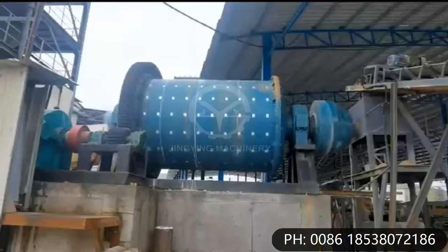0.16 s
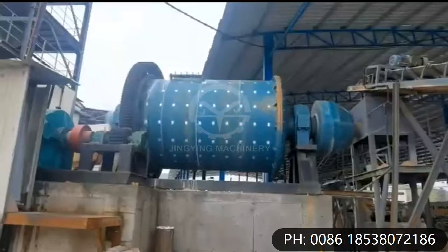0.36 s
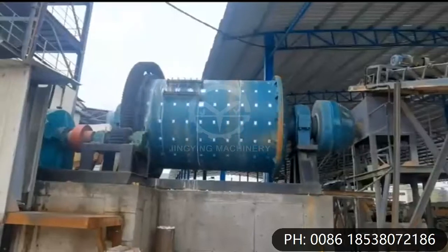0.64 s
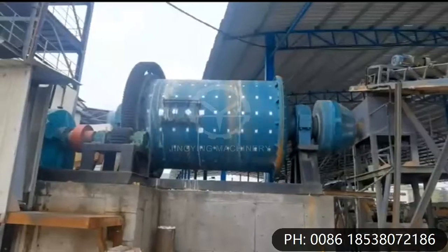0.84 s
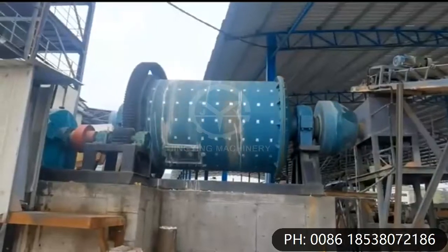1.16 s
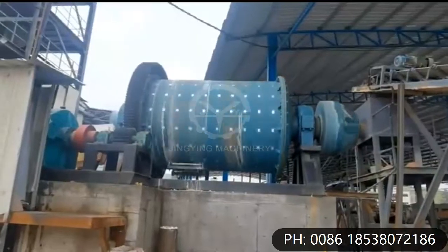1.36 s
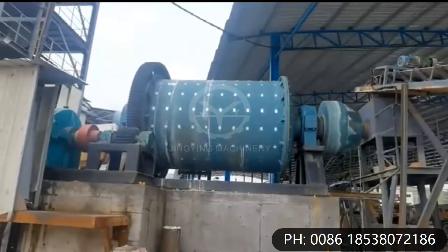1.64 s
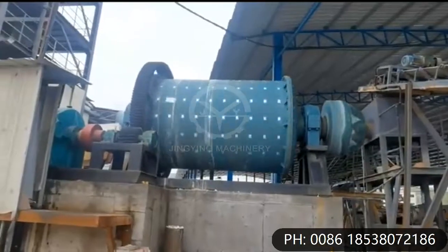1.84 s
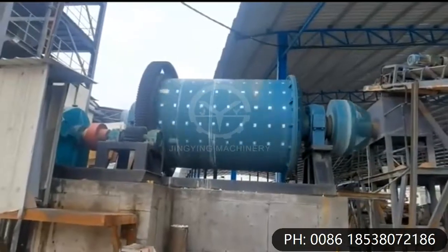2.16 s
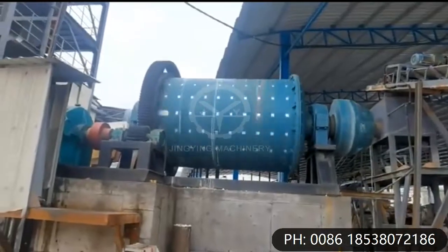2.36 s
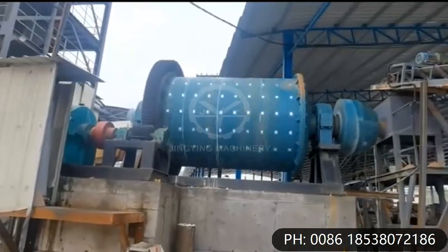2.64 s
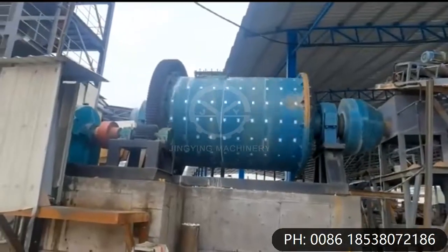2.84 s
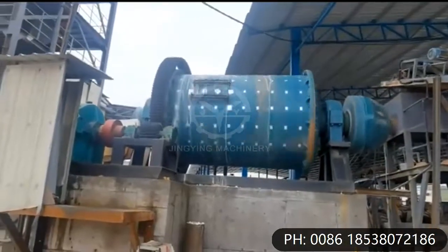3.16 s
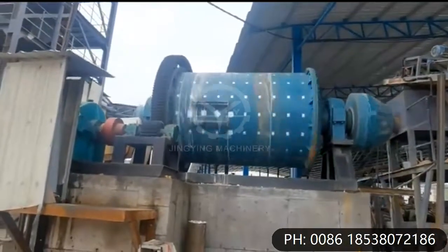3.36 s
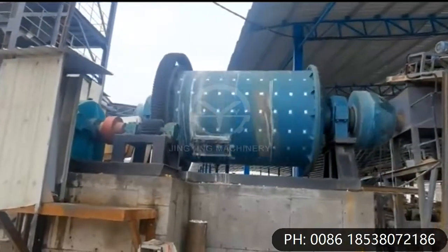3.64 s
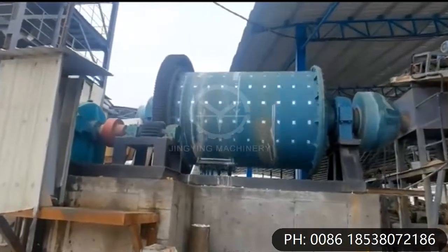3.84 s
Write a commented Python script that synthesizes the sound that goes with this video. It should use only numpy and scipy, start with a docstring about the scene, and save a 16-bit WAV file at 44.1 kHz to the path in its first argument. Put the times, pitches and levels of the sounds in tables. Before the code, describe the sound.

A large rotating ball mill roars low and dense, with tumbling steel balls clattering inside.

```python
"""In an open yard, a large steel drum full of grinding balls turns on its gear drive, some metres off.
The tumbling charge is shaped noise plus knocks that ring the shell; the gear teeth hum as wavering tones.
Heavy slumps boom in the shell with hollow notes, and balls clash as bursts of hiss and ringing ticks.
A thin whine comes and goes, and a deep noisy rumble mostly dies away halfway.
The sound cuts in after a short silence."""
import sys
import numpy as np
from scipy import signal
from scipy.fft import rfft, irfft
from scipy.io import wavfile
from scipy.ndimage import uniform_filter1d

SR = 44100
rng = np.random.default_rng(int(sys.argv[2]) if len(sys.argv) > 2 else 0)


def to_wav(sig):
    """Store sig (one row per channel, or 1-D mono) as 16-bit WAV at the path in sys.argv[1].

    Samples outside -1..1 are clipped; the rate is SR.
    """
    pcm = np.clip(np.atleast_2d(sig), -1, 1) * 32767
    pcm = np.round(pcm).astype(np.int16)
    wavfile.write(sys.argv[1], SR, pcm.T)  # frames by channels


N = 176400  # samples: 4 s


def amp(db):
    """Turns decibels into a gain."""
    return 10 ** (np.asarray(db) / 20)


def evened(x):
    """Scales a signal to an average strength (rms) of 1."""
    return x / np.sqrt(np.mean(x ** 2) + 1e-20)


def curve(table, column):
    """Draws straight lines through one column of a time table, giving a value for every sample."""
    rows = np.array(table)
    return np.interp(np.arange(N) / SR, rows[:, 0], rows[:, column])


def wander(top_hz):
    """Random drift, mostly slower than top_hz, rms 1."""
    spectrum = rfft(rng.standard_normal(N))
    hz = np.fft.rfftfreq(N, 1 / SR)
    return evened(irfft(spectrum / (1 + (hz / top_hz) ** 4), N))


def coloured(x, points, patch_db, size):
    """Gives x a spectrum and drifting patches up to patch_db louder or softer, rms 1."""
    overlap = size * 3 // 4
    hz, _, z = signal.stft(x, SR, nperseg=size, noverlap=overlap)
    # Smooth random values over neighbouring pitches, then over neighbouring moments.
    patches = uniform_filter1d(rng.standard_normal(z.shape), 8, 0)
    patches = evened(uniform_filter1d(patches, 8, 1))
    point_hz, point_db = np.transpose(points)
    shape_db = np.interp(np.log(hz + 1), np.log(point_hz + 1), point_db, left=-90, right=-90)
    gain = amp(shape_db[:, None] + patch_db * np.tanh(patches))
    out = signal.istft(z * gain, SR, nperseg=size, noverlap=overlap)[1]
    return evened(out[:N])


def impacts(per_s, spread_db):
    """Clicks at random moments, a few of them large, rms 1."""
    size = amp(spread_db * np.minimum(rng.exponential(1, N), 5))
    size = size * rng.choice([-1., 1.], N)
    return evened(size * (rng.random(N) < per_s / SR))


def ring(drive, hz, db, t60):
    """Lets drive strike one shell mode, a tone that fades by 60 dB in t60 seconds."""
    t = np.arange(SR // 3) / SR
    tap = amp(-60 * t / t60) * np.sin(2 * np.pi * hz * t)
    tap = tap / np.linalg.norm(tap)  # steady clicks of rms 1 give rms 1, before db
    return amp(db) * signal.oaconvolve(drive, tap)[:N]


# Loudness of the low roar through time: start_s [s], level_db [dB]
ROAR_LEVEL = [(0.27, -22), (0.39, -15), (0.44, -23), (0.5, -19.5), (0.75, -19), (1.05, -17.5), (1.4, -18),
              (1.7, -17.5), (1.77, -17.5), (1.92, -19.5), (2.14, -16.5), (2.25, -18), (2.7, -20),
              (2.98, -18), (3.14, -21.5), (3.32, -17.5), (3.4, -23), (3.56, -24.5), (3.7, -23), (3.94, -20),
              (4.0, -19)]
# Spectrum of the tumbling charge: pitch_hz [Hz], relative_level_db [dB per Hz]
ROAR_SPECTRUM = [(24, -57), (40, -32), (75, -33.5), (115, -1), (130, -2), (160, -11), (185, -1.5),
                 (205, -3.5), (240, -4), (283, 0.5), (305, -8), (322, -1), (342, -1), (367, -16),
                 (400, -3.5), (430, -10.5), (542, -5.5), (852, -22.5), (944, -16), (1080, -41),
                 (1300, -25.5), (1690, -52.5), (2860, -120)]
# Ringing modes of the shell: pitch_hz [Hz], relative_level_db [dB], undamped ring_time_s [s to fall 60 dB]
SHELL_MODES = [(217.7, -12, 0.067), (280.9, -3, 0.67), (400, -2, 0.33), (461, -5, 0.31), (500.6, -6, 0.069),
               (548.2, -2, 0.099), (630, -5.5, 0.074), (692.6, -3, 0.15), (781, -8, 0.2),
               (975, -12.5, 0.17), (1150, -18.5, 0.034), (1278, -19, 0.076), (1410, -28, 0.17)]
TUMBLE_DB, TUMBLE_PATCH_DB = -1.5, 4  # dB
KNOCKS_PER_S, KNOCK_SPREAD_DB, KNOCK_DB = 280, 11, -9.5


def roar():
    """The charge tumbles as dense noise, and its single knocks ring the shell."""
    knocks = sum(ring(impacts(KNOCKS_PER_S, KNOCK_SPREAD_DB), *mode) for mode in SHELL_MODES)
    tumbling = coloured(rng.standard_normal(N), ROAR_SPECTRUM, TUMBLE_PATCH_DB, size=2048)
    mix = amp(TUMBLE_DB) * tumbling + amp(KNOCK_DB) * evened(knocks)
    return amp(curve(ROAR_LEVEL, column=1)) * mix


# Loudness of the gear hum through time, before HUM_DB is added: start_s [s], relative_level_db [dB]
HUM_LEVEL = [(.27, -20.5), (.8, -26.5), (1.1, -23), (1.4, -22.5), (1.55, -28), (1.8, -27.5), (2.2, -24),
             (2.6, -24.5), (2.68, -28), (2.85, -24), (3.13, -31), (3.3, -26.5), (3.5, -32), (4, -27.5)]
# Steady drive tones: pitch_hz [Hz], relative_level_db [dB]
GEAR_TONES = [(130.1, -12), (195.2, -19), (254.6, -13), (320.3, -5), (456, -19)]
HUM_DB = 6
GEAR_WAVER_DB, GEAR_WAVER_HZ = 2, 8  # most change in level, top speed of that change
SPEED_JITTER = .0008  # rms share of the speed


def gears():
    """The gear teeth hum in tones that share one speed drift but waver in level on their own."""
    t = np.cumsum(1 + SPEED_JITTER * wander(3)) / SR
    hum = np.zeros(N)
    for hz, db in GEAR_TONES:
        level = amp(db + GEAR_WAVER_DB * np.tanh(wander(GEAR_WAVER_HZ)))
        hum += np.sqrt(2) * level * np.sin(2 * np.pi * (hz * t + rng.random()))
    return amp(curve(HUM_LEVEL, column=1) + HUM_DB) * hum


# Heavy slumps of the charge; booms and notes each shift the level:
# start_s [s], relative_level_db [dB], favoured pitch_hz [Hz], length_s [s], hardness [0-1]
SLUMPS = [(0.25, -10, 549, 0.056, 0.07), (0.315, -8.5, 490, 0.015, 0.23), (0.367, -11, 549, 0.069, 0.46),
          (0.448, -7.5, 493.7, 0.065, 0.37), (0.54, -14, 594.5, 0.087, 0.4), (0.625, -13, 501, 0.07, 0.53),
          (0.702, -18.5, 551, 0.033, 0.2), (0.811, -12.5, 512, 0.031, 0.6), (0.898, -15, 530, 0.022, 0.1),
          (0.984, -16, 468, 0.044, 0.26), (1.067, -11, 507, 0.035, 0.1), (1.206, -15, 740, 0.011, 0.4),
          (1.254, -7.5, 538, 0.032, 0), (1.306, -11, 458, 0.047, 0.46), (1.458, -9.5, 551, 0.069, 0.12),
          (1.639, -5, 556, 0.022, 0.3), (1.681, -12, 571.3, 0.035, 0.2), (1.743, -14, 568, 0.039, 0),
          (1.752, -10.5, 273, 0.035, 0), (1.797, -5.5, 310, 0.0096, 0.02), (1.832, -8.5, 546, 0.03, 0.2),
          (1.87, -10, 576, 0.045, 0.8), (1.925, -3, 549, 0.015, 0.2), (1.982, -13, 487, 0.057, 0.56),
          (2.064, -14.5, 459, 0.051, 0.11), (2.101, -13, 469, 0.027, 0.07), (2.105, -6, 253, 0.034, 0.01),
          (2.291, -8.5, 556, 0.016, 0), (2.663, -7.5, 572, 0.021, 0.44), (2.695, -8, 272, 0.013, 0),
          (2.696, -12.5, 703, 0.03, 0.84), (2.719, -8, 268, 0.012, 0), (2.746, -16, 483, 0.025, 0),
          (2.824, -13.5, 630, 0.023, 0.2), (2.874, -7, 263, 0.0099, 0.04), (2.886, -12, 583, 0.027, 0.33),
          (2.94, -11.5, 560.4, 0.07, 0), (3.022, -22, 563, 0.026, 0.3), (3.081, -6, 564, 0.027, 0.29),
          (3.11, -4.5, 523, 0.011, 0.03), (3.226, -15.5, 588, 0.026, 0.04), (3.874, -20.5, 468, 0.038, 0.5),
          (3.937, -9.5, 557, 0.013, 0.1)]
BOOM_DB, BOOM_RISE_S, BOOM_HITS_PER_S = -13.5, 0.0011, 900
BOOM_FOCUS = 0.12  # how far from its pitch a slump still rings a mode, in log pitch
BOOM_RING_SHARE = 0.6  # the charge damps the shell, shortening the ring times
BOOM_LEAD_DB, BOOM_LEAD_S = 3, 0.01  # extra strength at the start, and how fast it fades
FIRST_BLOW_DB = 24


def booms():
    """Each slump is a run of blows ringing modes near its pitch; hard ones ring every mode, high ones more."""
    t = np.arange(N) / SR
    first_blows = np.zeros(N)
    shapes = []
    for start, db, _, length, _ in SLUMPS:
        lead_db = BOOM_LEAD_DB * np.exp(-np.abs(t - start) / BOOM_LEAD_S)
        rise = np.clip((t - start) / BOOM_RISE_S, 0, 1)
        fall = np.clip((start + length - t) / BOOM_RISE_S, 0, 1)
        shapes.append(amp(db + lead_db) * rise * fall)
        first_blows[round((start + BOOM_RISE_S) * SR)] = amp(FIRST_BLOW_DB)
    out = np.zeros(N)
    for hz, db, t60 in SHELL_MODES:
        force = np.zeros(N)
        for shape, (_, _, pitch, _, hardness) in zip(shapes, SLUMPS):
            nearness = np.exp(-(np.log(hz / pitch) / BOOM_FOCUS) ** 2)
            force += shape * (hardness * hz / pitch + nearness)
        blows = first_blows + impacts(BOOM_HITS_PER_S, 3.5)
        out += ring(force * blows, hz, db, t60 * BOOM_RING_SHARE)
    return amp(BOOM_DB) * out


NOTE_DB, NOTE_RISE_S, NOTE_WAVER_DB = -9, .004, 1
NOTE_SAG_DB, NOTE_T60_S = -4, .05  # change over the slump, then time to fall 60 dB


def notes():
    """Under each slump the shell holds a short hollow note, a plain tone at the slump's pitch."""
    t = np.arange(SR // 4) / SR
    out = np.zeros(N + SR)
    for (start, db, hz, length, _), phase in zip(SLUMPS, rng.random(len(SLUMPS))):
        sag_db = NOTE_SAG_DB * np.minimum(t / length, 1)
        fade_db = -60 * np.maximum(t - length, 0) / NOTE_T60_S
        level = np.minimum(t / NOTE_RISE_S, 1) * amp(db + NOTE_DB + sag_db + fade_db)
        out[round(start * SR):][:len(t)] += level * np.sin(2 * np.pi * (hz * t + phase))
    return np.sqrt(2) * amp(NOTE_WAVER_DB * np.tanh(wander(40))) * out[:N]


# Steady part of the ball noise: start_s [s], middle_level_db [dB], hiss_level_db [dB]
BALL_LEVEL = [(.25, -30, -40.5), (.29, -27, -29.5), (.46, -29.5, -32.5), (.6, -31, -32), (.81, -30, -31),
              (1.19, -31, -32), (1.45, -28, -30), (1.77, -30.5, -32.5), (1.95, -30, -34), (2.1, -33, -32.5),
              (2.3, -32.5, -33), (2.46, -33, -36), (2.62, -35.5, -34), (2.68, -33, -38.5), (2.74, -30, -40),
              (2.84, -35.5, -36.5), (3.05, -35, -36), (3.12, -34.5, -39), (3.2, -37, -37),
              (3.38, -38.5, -38), (3.69, -36, -37), (3.9, -34.5, -39), (4, -36, -36.5)]
# Spectrum of the middle clatter: pitch_hz [Hz], relative_level_db [dB per Hz]
CLATTER_SPECTRUM = [(410, -31), (700, 1.5), (945, -2.5), (1130, -7.5), (1620, -12.5), (2190, -12),
                    (3040, -23.5), (4200, -38), (5460, -59), (9240, -120)]
# Spectrum of the treble hiss: pitch_hz [Hz], relative_level_db [dB per Hz]
HISS_SPECTRUM = [(1470, -18.5), (2500, -7.5), (3740, -6.5), (6110, 0), (8090, -3), (9040, -7), (10100, -24),
                 (13100, -68), (22000, -120)]
# Showers of balls landing together; the hiss and middle levels are shifted by the settings below:
# start_s [s], relative_hiss_db [dB], relative_middle_db [dB], fade_s [s to fall 60 dB],
# ring pitch_hz [Hz], ring_level_db [dB]
SHOWERS = [(0.2844, -32, -42, 0.94, 6100, -36), (0.3794, -23.5, -45, 0.28, 5400, -34),
           (0.5224, -27, -35, 0.15, 6000, -34), (0.6594, -24.5, -41, 0.44, 5860, -36),
           (1.475, -23, -58, 0.21, 5300, -28), (1.6094, -24, -42, 0.27, 5940, -40),
           (1.762, -23.5, -48, 1, 5960, -36), (1.9807, -19, -29, 0.19, 6200, -42),
           (2.1201, -20, -49, 0.25, 7400, -44), (2.132, -27, -37.5, 0.5, 5230, -34),
           (2.275, -35, -53, 0.32, 5960, -37), (2.486, -21, -36.5, 0.44, 5760, -28),
           (2.663, -39, -39, 0.36, 6300, -46), (2.7094, -27, -41, 0.42, 6200, -45),
           (2.8605, -26, -49, 0.3, 6300, -36), (2.878, -29, -42, 0.2, 5900, -38),
           (2.9456, -32, -47, 0.21, 6100, -36), (3.08, -39, -40, 0.35, 6300, -46),
           (3.225, -26.5, -37.5, 0.22, 6350, -38), (3.523, -36, -52, 0.13, 6450, -45),
           (3.5947, -25, -40, 0.19, 5640, -37), (3.8213, -26.5, -38, 0.2, 6800, -40),
           (3.969, -23, -38, 0.16, 6300, -35)]
SHOWER_RISE_S, SHOWER_HISS_DB, SHOWER_MID_DB = 0.0071, -7, 7
BALLS_PER_S, BALL_SPREAD_DB = 2500, 1.5
TICK_SHARE = 0.35  # share of the power in ticks; the rest is smooth noise
MID_PATCH_DB, HISS_PATCH_DB = 5, 2


def balls():
    """Steel strikes steel: fine ticks mixed into noise make clatter and hiss, surging at each shower."""
    t = np.arange(N) / SR
    mid_power = amp(curve(BALL_LEVEL, column=1)) ** 2
    hiss_power = amp(curve(BALL_LEVEL, column=2)) ** 2
    for start, hiss_db, mid_db, fade, _, _ in SHOWERS:
        rise = np.clip((t - start) / SHOWER_RISE_S, 0, 1)
        shape = rise * amp(-60 * np.maximum(t - start, 0) / fade)
        mid_power += (amp(mid_db + SHOWER_MID_DB) * shape) ** 2
        hiss_power += (amp(hiss_db + SHOWER_HISS_DB) * shape) ** 2
    ticks = np.sqrt(TICK_SHARE) * impacts(BALLS_PER_S, BALL_SPREAD_DB)
    drive = ticks + np.sqrt(1 - TICK_SHARE) * rng.standard_normal(N)
    clatter = np.sqrt(mid_power) * coloured(drive, CLATTER_SPECTRUM, MID_PATCH_DB, size=1024)
    hiss = np.sqrt(hiss_power) * coloured(drive, HISS_SPECTRUM, HISS_PATCH_DB, size=512)
    return clatter + hiss


# Tones in one steel clash: multiple of the ring pitch [ratio], relative_level_db [dB]
STEEL_PARTIALS = [(1.001, 3), (1.43, 2.5)]
STEEL_T60_S, RATTLE_RISE_S = .005, 0.0058
RATTLE_PER_S, RATTLE_SPREAD_DB = 1600, 2.5


def rattles():
    """Each shower is a quick run of ticks, ringing briefly in steel at its own pitch."""
    t = np.arange(SR // 4) / SR
    tap_t = t[:400]
    out = np.zeros(N + SR)
    ticks = impacts(RATTLE_PER_S, RATTLE_SPREAD_DB)
    for start, _, _, fade, hz, ring_db in SHOWERS:
        at = round(start * SR)
        tones = sum(amp(db) * np.sin(2 * np.pi * ratio * hz * tap_t) for ratio, db in STEEL_PARTIALS)
        tap = amp(-60 * tap_t / STEEL_T60_S) * tones
        level = np.minimum(t / RATTLE_RISE_S, 1) * amp(ring_db - 60 * t / fade)
        run = np.roll(ticks, -at)[:len(t)] * level
        out[at:at + len(t)] += signal.oaconvolve(run, tap / np.linalg.norm(tap))[:len(t)]
    return out[:N]


# Loudness of the thin whine, before its flutter: start_s [s], level_db [dB]
WHINE_LEVEL = [(.27, -58), (.33, -40), (.4, -56), (1.33, -55), (1.37, -41), (1.44, -50), (1.55, -42),
               (1.59, -53), (1.63, -39), (1.69, -52), (1.73, -39), (1.78, -54), (2.2, -49), (2.4, -58),
               (2.5, -58), (2.54, -48), (2.75, -54), (3.02, -60), (3.07, -45), (3.12, -60), (3.225, -60),
               (3.24, -44), (3.58, -45), (3.61, -51), (3.64, -44), (3.69, -45), (3.71, -57), (4, -52)]
WHINE_HZ, WHINE_DRIFT_HZ, WHINE_WAVER_DB = 2131.5, 1.5, 3


def whine():
    """A thin tone with a slight pitch drift flutters and comes and goes in level."""
    turns = np.cumsum(WHINE_HZ + WHINE_DRIFT_HZ * wander(5)) / SR
    flutter_db = WHINE_WAVER_DB * np.tanh(wander(21))
    return np.sqrt(2) * amp(curve(WHINE_LEVEL, column=1) + flutter_db) * np.sin(2 * np.pi * turns)


# Loudness of the deep rumble, for its noise part: start_s [s], level_db [dB]
RUMBLE_LEVEL = [(.27, -34.5), (.6, -33.5), (.95, -24.5), (1.1, -36), (1.38, -30.5), (1.7, -25), (1.9, -39),
                (1.98, -53), (2.6, -57), (2.68, -46), (2.76, -61), (4, -52)]
# Spectrum of the rumble's noise: pitch_hz [Hz], relative_level_db [dB per Hz]
RUMBLE_SPECTRUM = [(15, -12), (30, -15), (50, -3), (65, 8.5), (90, -6), (150, -49.5)]
DEEP_TONE_HZ, DEEP_TONE_DB = 65, -3.5  # level relative to the noise


def rumble():
    """Lumpy deep noise surrounds one low tone, and both follow the same level."""
    turns = DEEP_TONE_HZ * np.arange(N) / SR + rng.random()
    tone = np.sqrt(2) * amp(DEEP_TONE_DB) * np.sin(2 * np.pi * turns)
    noise = coloured(rng.standard_normal(N), RUMBLE_SPECTRUM, 0.52, size=4096)
    return amp(curve(RUMBLE_LEVEL, column=1)) * (tone + noise)


def scene():
    """Adds all layers into one mono channel."""
    drum = roar() + gears() + booms() + notes()
    steel = balls() + rattles()
    return (drum + steel + whine() + rumble())[None]


START_S, CUT_IN_S = .249, .004
PEAK_LIMIT = 0.61  # ceiling of the soft rounding, before the filters
LOW_CUT_HZ, TOP_EDGE_HZ = 44, 10050


def record(dry):
    """Cuts in after the silence, rounds peaks softly, drops the deepest bass, then limits the treble."""
    on = np.clip((np.arange(N) / SR - START_S) / CUT_IN_S, 0, 1)
    rounded = PEAK_LIMIT * np.tanh(dry * on / PEAK_LIMIT)
    low_cut = signal.butter(3, LOW_CUT_HZ, "high", fs=SR, output="sos")
    thin = signal.sosfilt(low_cut, rounded)
    top_cut = signal.firwin(511, TOP_EDGE_HZ, window=("kaiser", 9), fs=SR)
    return signal.oaconvolve(thin, top_cut[None], "same")


dry = scene()
out = record(dry)
to_wav(out)
```